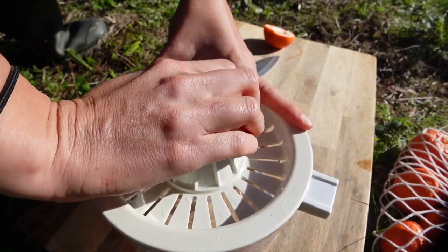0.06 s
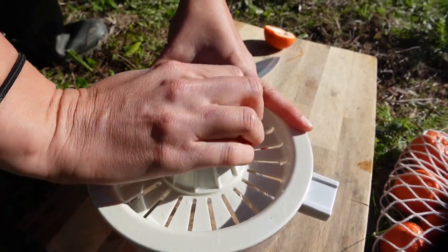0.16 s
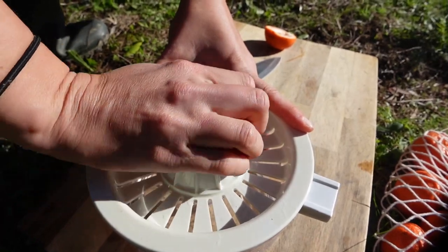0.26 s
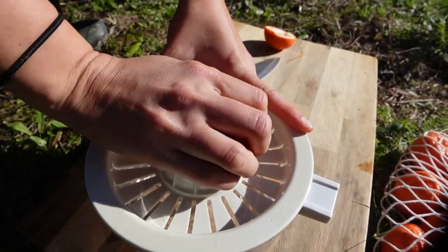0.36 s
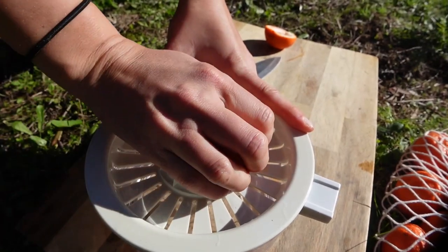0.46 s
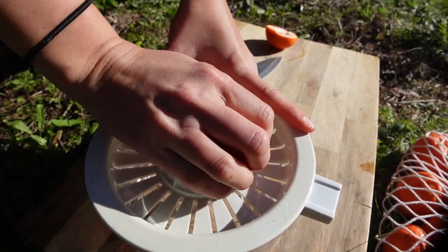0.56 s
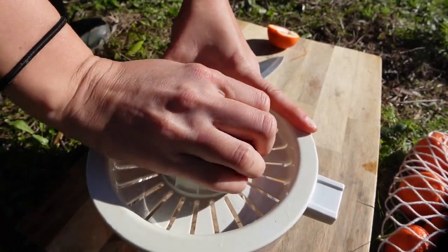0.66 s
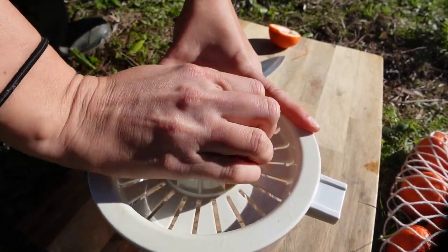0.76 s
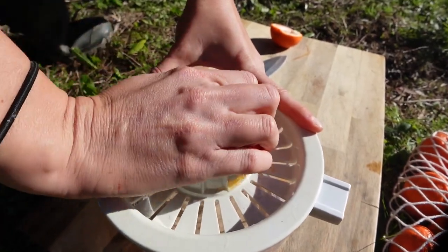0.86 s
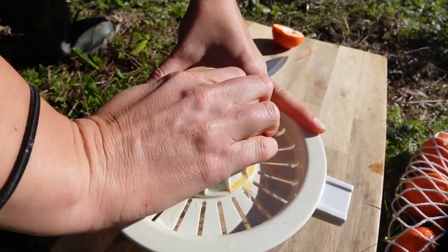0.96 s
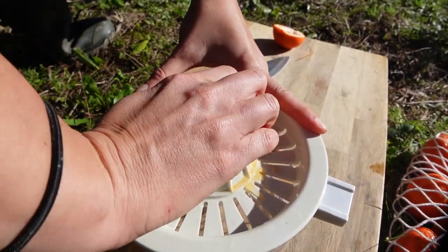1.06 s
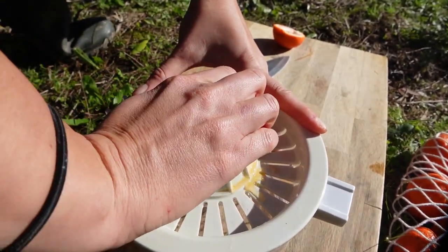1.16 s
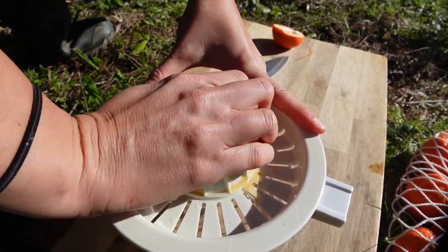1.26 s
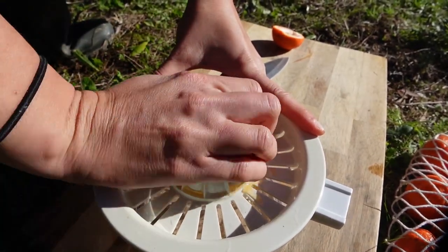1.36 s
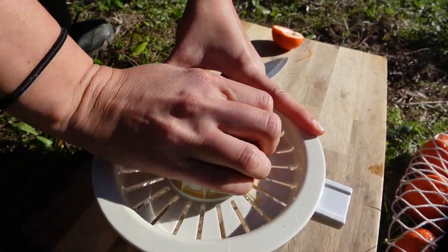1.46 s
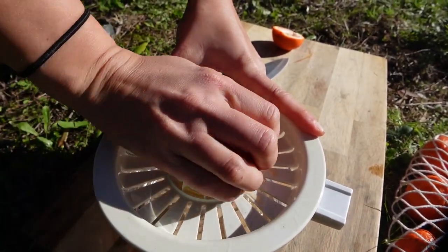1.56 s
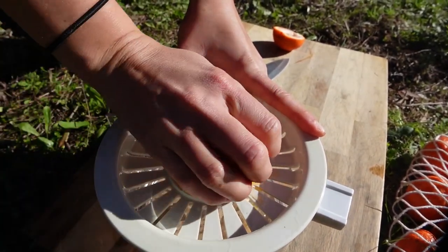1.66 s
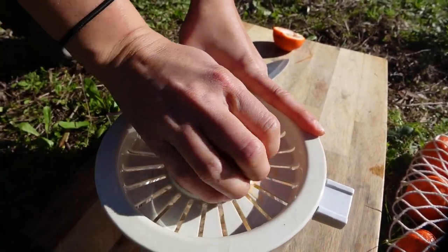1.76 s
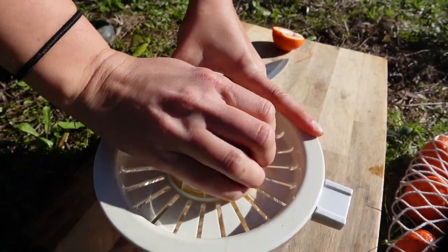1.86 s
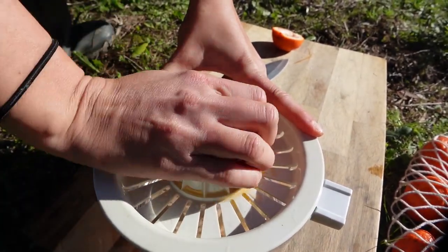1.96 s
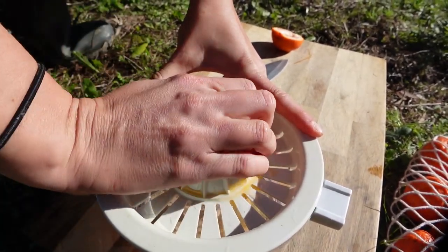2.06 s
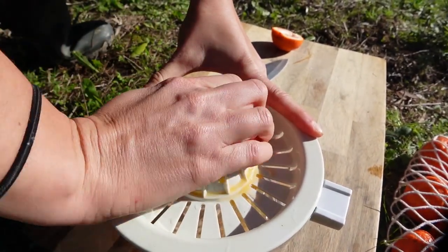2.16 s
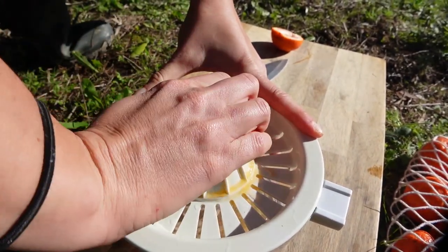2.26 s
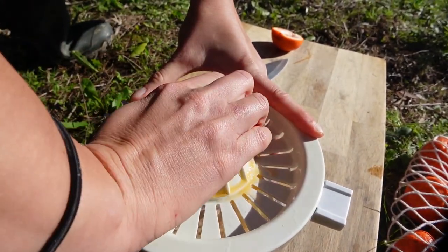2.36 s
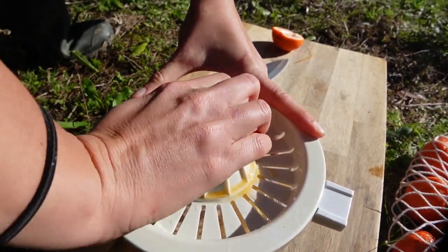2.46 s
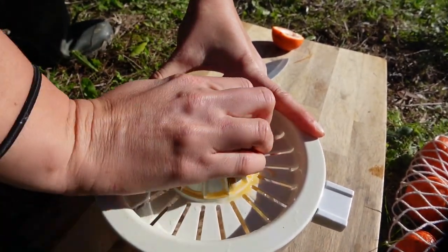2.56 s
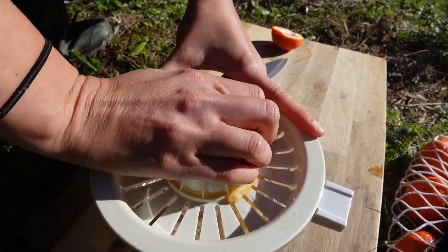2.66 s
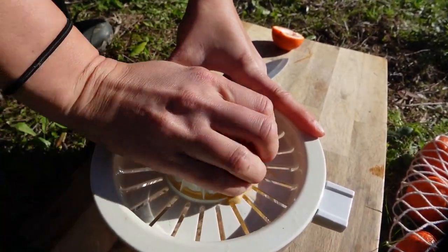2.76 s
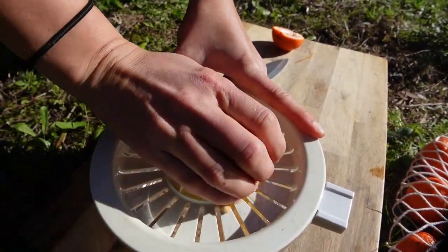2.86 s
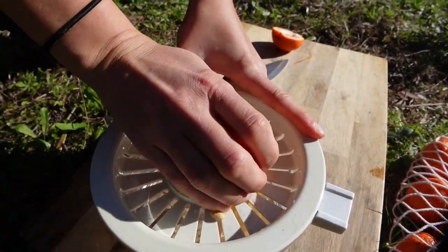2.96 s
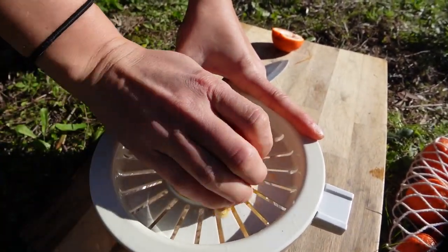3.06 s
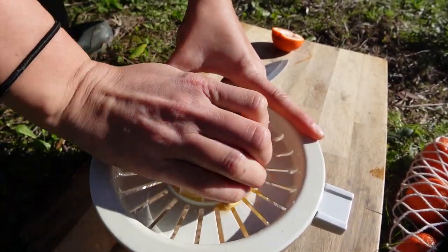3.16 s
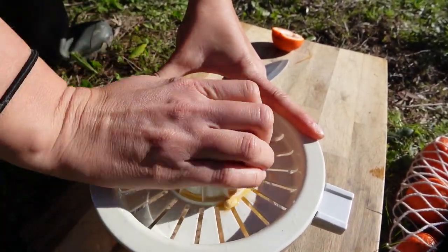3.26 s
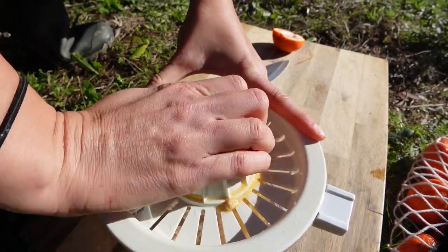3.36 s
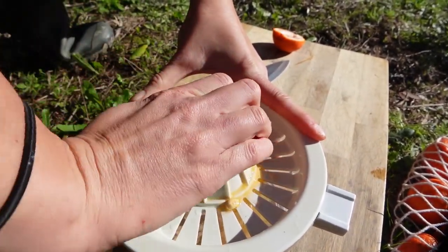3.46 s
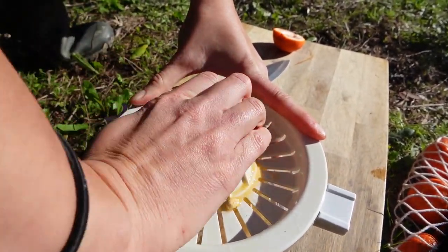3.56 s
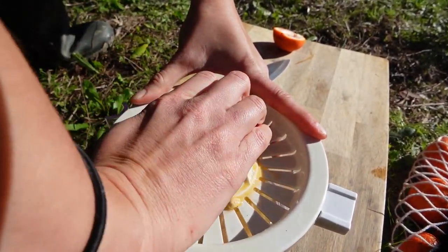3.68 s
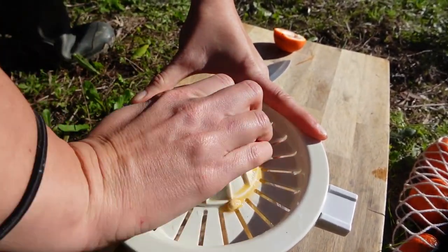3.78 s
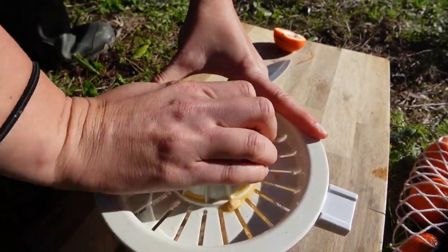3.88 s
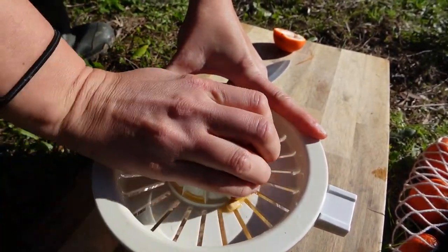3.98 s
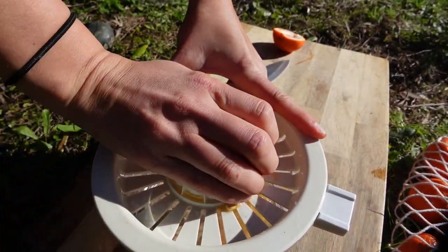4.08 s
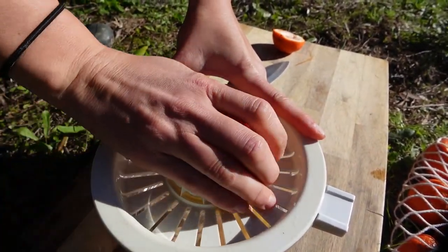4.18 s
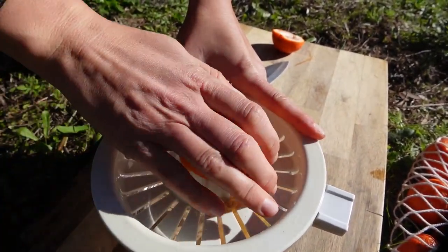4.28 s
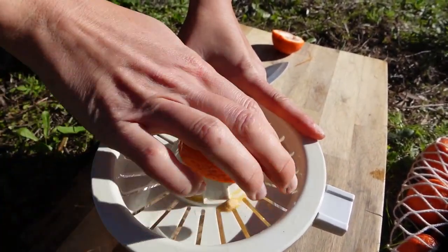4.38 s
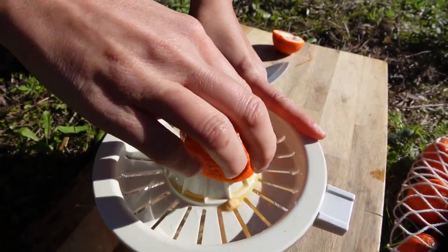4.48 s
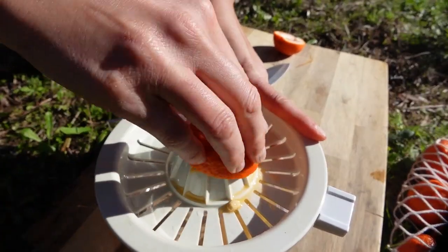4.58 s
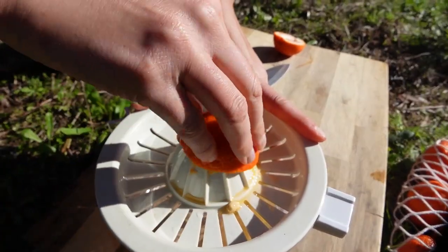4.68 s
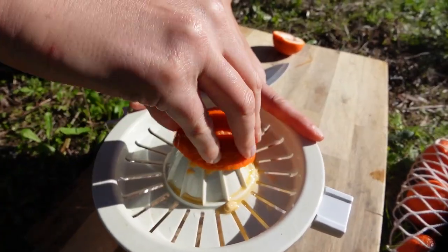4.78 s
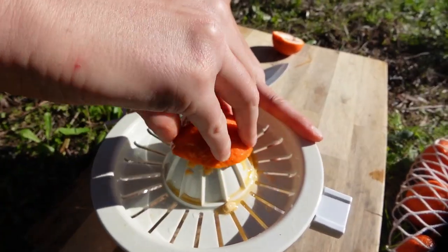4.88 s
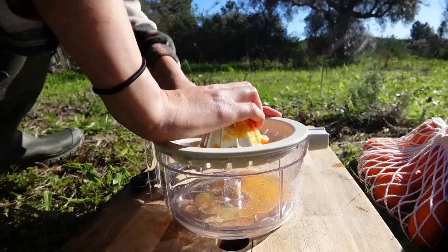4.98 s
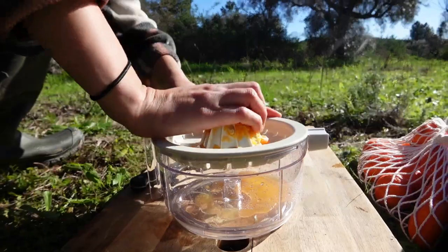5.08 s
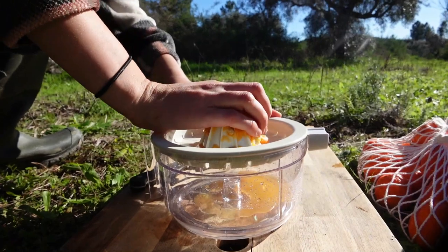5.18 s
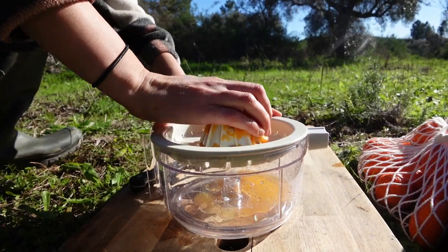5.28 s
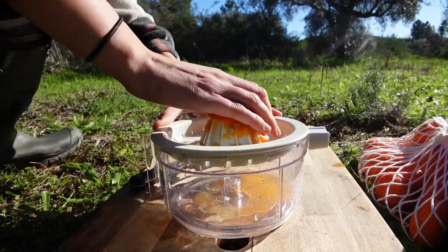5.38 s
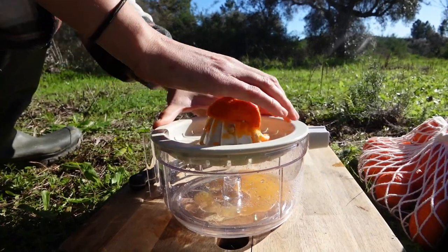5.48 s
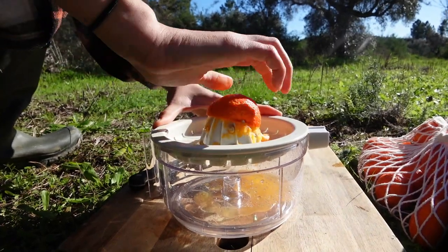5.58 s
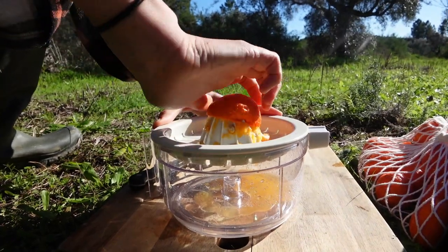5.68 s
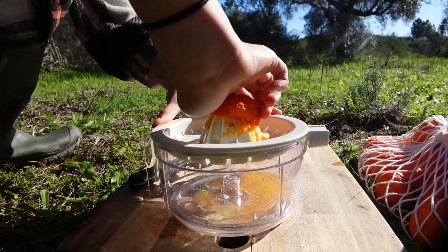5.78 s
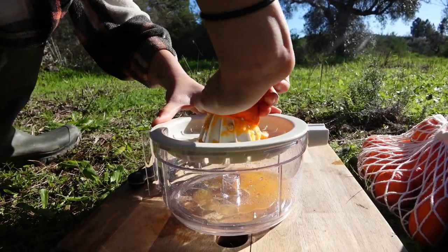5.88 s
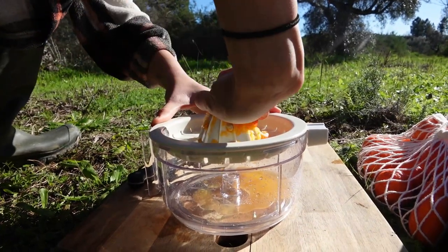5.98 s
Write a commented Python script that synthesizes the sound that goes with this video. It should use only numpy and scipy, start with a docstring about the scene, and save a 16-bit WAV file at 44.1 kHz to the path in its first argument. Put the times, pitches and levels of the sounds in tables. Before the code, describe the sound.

An orange half is twisted by hand on a ribbed plastic juicer, heard close up over a faint outdoor hush. The first turn swells into a wet crackle with a short rasp of peel and the loudest plastic knock at about 0.45 seconds. From 0.7 to 4.1 seconds, six more twists follow, roughly one every 0.6 seconds, each a soft squelch of tearing pulp with small juicy pops. Clusters of sharp plastic clicks come around 1, 2, 3.3 and 3.9 seconds, with brief wet swishes near 2.8 and 3.6. After 4.2 seconds the handling turns quieter, with light squishes and tiny pops, then a few more clicks just after 5 seconds. From about 5.2 to 5.8 seconds a small bird further off gives four faint, quick rattles of high falling notes. One last small squish comes at 6 seconds.

```python
"""Wet crackling and popping come first: an orange half is twisted by hand on the ribbed plastic reamer
of a juicer, on a wooden board in a field. Juice sacs rupture as tiny impulses and air pockets ring as
damped oscillators. The peel rasps by stick-slip friction, and the reamer slips and knocks in its bowl,
exciting the modes of the plastic. Near the end a small bird gives four short rattles of falling notes,
over a faint outdoor hush."""
import sys
import numpy as np
from scipy import signal
from scipy.fft import rfft, irfft, next_fast_len
from scipy.io import wavfile
from scipy.ndimage import map_coordinates

SR = 44100
rng = np.random.default_rng(int(sys.argv[2]) if len(sys.argv) > 2 else 0)


def persist_wave(psi):
    """Save psi, clipped to +-1, as 16-bit WAV."""
    counts = np.round(np.clip(psi, -1, 1) * 32767).astype(np.int16)
    wavfile.write(sys.argv[1], SR, np.atleast_2d(counts).T)


N = 265923
TIME = np.arange(N) / SR
HIT = np.arange(6000) / SR  # time axis of one short event [s]

# Spectrum of the open air: (frequency [Hz], gain [dB])
HUSH_SPECTRUM = [(25, -27), (42, -30), (65, -6.5), (120, -0.5), (165, -3), (220, -4.5), (360, -7),
                 (480, -10), (700, -5), (950, -11.5), (1300, -6), (2300, -13.5), (4000, -12), (7000, -21.5),
                 (16000, -29.5)]
# The bird's calls: (time [s], relative level [dB], growth per note [dB])
BIRD_RATTLES = [(5.184, -56, 2.5), (5.364, -57, 1.5), (5.558, -55, 0), (5.747, -57.5, 1)]
# Notes of one call: (delay [s], length [s], start pitch [Hz], end pitch [Hz], relative level [dB])
RATTLE_NOTES = [(0, 0.017, 5310, 4540, 3), (.019, 0.0142, 5230, 4490, 3.5), (.044, .016, 4900, 3890, -0.5),
                (.071, 0.0136, 4680, 3880, -4)]
# Modes of the plastic juicer, from bowl to ribs: (frequency [Hz], relative level [dB], t60 [s])
JUICER_MODES = [(398, -6.5, 0.065), (499.5, 1.5, 0.05), (567, -2, 0.041), (677, -3, 0.018),
                (1109, 0, 0.046), (1254, -3, 0.074), (1363.5, 0.5, 0.046), (1510, -9, 0.068),
                (1820, -5.5, 0.0058), (2004, -1.5, 0.064), (2680, 4, 0.037), (2971, -2.5, 0.053),
                (3100, -5, 0.053), (3320, -6.5, 0.076), (3894, -5.5, 0.06), (4094, 0.5, 0.022),
                (4437, -1, 0.032), (4710, -6, 0.056), (5590, -1.5, 0.041), (6200, -2.5, 0.051),
                (6800, -11.5, 0.14), (8190, -32, 0.045)]
# Turns of the hand, to and fro; the last three pull the peel loose, lift it and set it back:
# (start [s], hardest push [s], end [s], squelch [dB], swell at the push [dB], friction [dB], fizz [dB])
HAND_TURNS = [(0.0, 0.428, 0.51, -62, 11, -67.5, -68), (0.718, 1.025, 1.097, -63.5, 3.5, -68.5, -69),
              (1.317, 1.483, 1.76, -61, 4, -74, -71.5), (1.879, 2.04, 2.33, -61, 7, -71.5, -70),
              (2.544, 2.61, 3.02, -58.5, 4, -71.5, -77), (3.146, 3.36, 3.54, -60.5, 2.5, -69.5, -69.5),
              (3.822, 3.945, 4.123, -58.5, 5.5, -71.5, -64.5), (4.18, 4.253, 4.37, -68, 1, -79, -78),
              (4.654, 4.927, 5, -67, 7, -75.5, -72.5), (5.06, 5.12, 5.18, -63, 3.5, -66.5, -68.5),
              (5.972, 6.0, 6.03, -63, 1.5, -89, -75)]
# Wet peel slides without catching: (middle [s], half length [s], level [dB], centre [Hz])
PEEL_GLIDES = [(2.822, .05, -55.5, 4800), (3.605, 0.074, -60, 6900), (5.54, 0.051, -65, 7160)]
# Peel drags over the ribs: (middle [s], half length [s], rasp [dB], rasp centre [Hz], bowl hum [dB])
PEEL_RUBS = [(0.291, 0.0091, -47.5, 2700, -61), (0.411, 0.012, -40, 2850, -46.5),
             (0.422, 0.013, -42, 6270, -54.5), (0.472, 0.0076, -54, 6500, -48),
             (1.79, 0.017, -53, 2860, -71), (2.643, 0.0083, -49.5, 3000, -56),
             (2.936, 0.018, -57.5, 1100, -61.5), (5.145, 0.0051, -49, 1300, -46.5)]
# Spectra of the rasping peel, the humming bowl and the tearing pulp: (frequency [Hz], gain [dB])
RASP_SPECTRUM = [(500, -69), (1200, 9.5), (2200, 4), (2750, 10), (4300, 4), (6300, 2), (9000, 0.5),
                 (15000, -26)]
BOWL_SPECTRUM = [(200, -72), (330, -2), (410, 3.5), (520, 8), (680, 6), (900, -11), (1500, -74)]
PULP_SPECTRUM = [(600, -20), (900, -12.5), (1200, -5.5), (1900, -1), (2300, -6), (2750, -1), (3400, -2),
                 (4600, 0), (5600, -4.5), (8500, -9.5), (10000, -17), (12000, -22), (16000, -44)]
# Juice sacs and air pockets burst: (time [s], relative level [dB], pitch [Hz])
LOUD_POPS = [(0.0305, -52, 3300), (0.118, -55.5, 3300), (0.1338, -58, 3800), (0.1886, -57, 6700),
             (0.2846, -49.5, 5800), (0.4612, -42, 5000), (0.5107, -52.5, 6000), (0.6244, -53.5, 3130),
             (0.9542, -55, 6600), (1.3045, -42, 3270), (1.3167, -44, 4300), (1.3249, -41, 4100),
             (1.4036, -44.5, 4560), (1.5173, -51, 3740), (1.5728, -48, 4200), (1.5764, -41.5, 4200),
             (1.6817, -55, 3850), (1.7148, -51.5, 2920), (1.7304, -51.5, 3700), (2.0886, -50, 4500),
             (2.4908, -52, 4080), (2.4992, -45, 4800), (2.9937, -57, 3600), (3.388, -51.5, 3830),
             (3.9413, -40.5, 3960), (4.0736, -53, 3870), (4.2178, -62, 8400), (4.6402, -56.5, 4800),
             (4.6516, -57, 6500), (4.772, -58, 4640), (4.8107, -60.5, 5510), (4.86, -59.5, 3160)]
# The reamer slips in its seat, with the relative level of each part:
# (time [s], bowl [dB], strainer [dB], strainer centre [Hz], crack [dB], crack centre [Hz])
REAMER_KNOCKS = [(0.4478, -36.5, -41, 1420, -30.5, 2880), (0.7173, -54, -44.5, 1450, -42, 4160),
                 (0.9893, -49.5, -43, 1330, -36.5, 4530), (1.034, -52, -45.5, 1310, -40, 4400),
                 (1.0618, -64, -58, 1280, -53.5, 4010), (1.945, -51.5, -47.5, 1500, -39.5, 4650),
                 (1.9778, -52, -44.5, 1444, -39.5, 5020), (2.0053, -48, -40.5, 1410, -35.5, 4455),
                 (2.0343, -49, -46, 1360, -45.5, 3580), (2.1717, -48.5, -36.5, 1334, -33, 4400),
                 (2.6233, -59, -42, 1100, -34.5, 4350), (3.1358, -61, -43, 1440, -49.5, 3400),
                 (3.2011, -57, -47.5, 1110, -51, 4640), (3.2322, -58.5, -49.5, 1230, -56, 4720),
                 (3.33, -53.5, -51.5, 1250, -43.5, 2720), (3.376, -50, -45.5, 1470, -46, 3600),
                 (3.866, -59.5, -48.5, 1470, -42.5, 4370), (3.892, -61, -45, 1510, -41, 4760),
                 (3.9108, -59, -44, 1980, -40.5, 2920), (4.0501, -62, -51.5, 1250, -47.5, 4200),
                 (5.0257, -55, -44.5, 1300, -54.5, 2670), (5.0407, -75, -47, 1170, -50, 2330),
                 (5.1302, -66, -51.5, 1360, -48.5, 5200), (5.1425, -48.5, -40, 1220, -50, 2800),
                 (5.2094, -59, -49, 1490, -42, 4840)]
# Balance of a small slip: (bowl [dB], strainer [dB], strainer centre [Hz], crack [dB], crack centre [Hz])
SLIP_BALANCE = (-5, 0.5, 1250, -1, 3400)


def amp(db):
    """Amplitude ratio of a level in decibels."""
    return 10 ** (np.asarray(db) / 20)


def unit(x):
    """Normalisation to rms 1."""
    return x / np.sqrt(np.mean(x ** 2) + 1e-20)


def blow(x):
    """Normalisation to the energy of rms 1 held for 20 ms."""
    return x / np.sqrt(np.sum(x ** 2) / (SR / 50) + 1e-20)


def add(track, s, x):
    """Superposition of x on the track at time s."""
    i = max(round(s * SR), 0)
    track[i:i + len(x)] += x[:max(len(track) - i, 0)]


def colour(x, points):
    """Minimum-phase filter through (frequency [Hz], gain [dB]) points."""
    m = 2 * next_fast_len(len(x) // 2 + 2048)
    hz, db = np.transpose(points)
    gain = amp(np.interp(np.log(np.fft.rfftfreq(m, 1 / SR) + 1), np.log(hz), db))
    cepstrum = irfft(np.log(gain + 1e-6), m)
    cepstrum[1:m // 2] *= 2
    cepstrum[m // 2 + 1:] = 0
    return irfft(rfft(x, m) * np.exp(rfft(cepstrum)), m)[:len(x)]


def favour(x, hz, skirt_db):
    """Selective excitation: the contact spot favours one register, skirt_db above those an octave off."""
    return colour(x, [(hz / 2, -skirt_db), (hz / 2 ** .5, -skirt_db * 0.71), (hz, 0),
                      (hz * 2 ** .5, -skirt_db * 0.77), (hz * 2, -skirt_db)])


def band(x, lo_hz, hi_hz, order=2):
    """Causal band-pass filter."""
    edges = [lo_hz, min(hi_hz, SR / 2 - 100)]
    return signal.sosfilt(signal.butter(order, edges, 'band', fs=SR, output='sos'), x)


def wobble(rate):
    """Smooth random modulation through rate knots a second."""
    return map_coordinates(rng.standard_normal(int(N * rate / SR) + 4), [TIME * rate])


def hump(t, middle, half):
    """Gaussian envelope, down to 1/e at middle +/- half."""
    return np.exp(-((t - middle) / half) ** 2)


def fade(t60):
    """Exponential damping by 60 dB in t60 seconds."""
    return np.exp(-np.log(1000) * HIT / t60)


def burst(t60, tail_db, tail_t60):
    """Double-slope decay: noise with a fast part and a slower tail."""
    return rng.standard_normal(len(HIT)) * (fade(t60) + amp(tail_db) * fade(tail_t60))


def scattered(x, wet_db, t60):
    """Diffuse reflection: nearby things add a faint tail to the direct sound."""
    tail = rng.standard_normal(len(HIT)) * fade(t60) * (1 - np.exp(-HIT / 0.0025))
    return x + amp(wet_db) * signal.fftconvolve(x, tail / np.linalg.norm(tail))[:N]


def hush():
    """Ambient noise: distant rumble and hiss, with a low swell and a hollow rustle near the end."""
    swell = amp(-70) * hump(TIME, 5.72, 0.15) * unit(band(rng.standard_normal(N), 124, 210, order=3))
    rustle = amp(-73) * hump(TIME, 5.33, 0.32) * unit(band(rng.standard_normal(N), 576, 724))
    air = amp(-66.5 + 0.14 * wobble(4.4)) * unit(colour(rng.standard_normal(N), HUSH_SPECTRUM))
    return air + swell + rustle


def bird(rough_hz=450, flutter_hz=800):
    """Fast frequency and amplitude modulation roughens the four falling notes of each rattle."""
    out = np.zeros(N)
    for s, db, growth_db in BIRD_RATTLES:
        for k, (delay, length, start_hz, end_hz, note_db) in enumerate(RATTLE_NOTES):
            progress = np.minimum(HIT / length, 1)
            jitter, shimmer = [unit(band(n, 115, flutter_hz)) for n in rng.standard_normal((2, len(HIT)))]
            hz = start_hz + (end_hz - start_hz) * progress + rough_hz * jitter
            envelope = np.abs(np.sin(np.pi * progress)) ** .5 * (1 + 0.31 * shimmer)
            note = envelope * np.sin(2 * np.pi * np.cumsum(hz) / SR)
            add(out, s + delay, amp(db + note_db + k * growth_db + 2.5) * note)
    return out


def turning(grip_db_per_s=220, release_db_per_s=139, push_half_s=0.081):
    """Amplitude follows effort: friction, squelch and fizz rise, swell at the push and die each turn."""
    friction, squelch, fizz = np.zeros((3, N))
    for start, push, end, squelch_db, swell_db, friction_db, fizz_db in HAND_TURNS:
        before, after = np.maximum(start - TIME, 0), np.maximum(TIME - end, 0)
        hold_db = -grip_db_per_s * before - release_db_per_s * after
        push_db = swell_db / (1 + ((TIME - push) / push_half_s) ** 2)
        effort = amp(hold_db + push_db)
        friction += amp(friction_db + hold_db + 0.89 * push_db)
        squelch += amp(squelch_db) * effort
        fizz += amp(fizz_db) * effort
    return friction, squelch, fizz


def by_chance(squelch, rate, over_db, spread_db):
    """Jittered event train, rate a second, that follows the squelch: (time [s], level [dB])."""
    timing, size = rng.random((int(rate * N / SR), 2)).T
    s = (np.arange(len(timing)) + timing) / rate
    level_db = 20 * np.log10(squelch[np.minimum(s * SR, N - 1).astype(int)] + 1e-9)
    return np.column_stack([s, level_db + over_db + spread_db * np.sqrt(3) * (2 * size - 1)])


def ring(lo_hz, hi_hz, scatter_db, detune=0.00605):
    """Modal vibration of the juicer in one register, struck at a new spot each time."""
    hz, db, t60 = np.transpose([mode for mode in JUICER_MODES if lo_hz <= mode[0] < hi_hz])[:, :, None]
    size, shift = rng.standard_normal((2, len(hz), 1))
    sign = (-1) ** np.arange(len(hz))[:, None]
    phase = 2 * np.pi * hz * (1 + detune * shift) * HIT
    modes = sign * amp(db + scatter_db * size) * fade(t60) * np.cos(phase)
    return unit(band(modes.sum(axis=0), lo_hz, hi_hz))


def crackle(rate, spread_db, smooth):
    """Shot noise: tiny ruptures of unequal size, rate a second, over a smooth share of noise."""
    sizes = amp(spread_db * np.minimum(rng.standard_normal(N), 2.6))
    grains = (rng.random(N) < rate / SR) * sizes * rng.choice([-1, 1], N)
    return unit(grains) + smooth * rng.standard_normal(N)


def glides():
    """Sliding friction: wet peel gives a soft swish that swells and fades."""
    out = np.zeros(N)
    for middle, half, db, hz in PEEL_GLIDES:
        swish = colour(crackle(rate=3000, spread_db=5, smooth=1.2), PULP_SPECTRUM)
        out += amp(db) * hump(TIME, middle, half) * unit(favour(swish, hz, skirt_db=5.5))
    return out


def rubs():
    """Stick-slip friction: quick runs of the peel rasp on the ribs and hum in the bowl."""
    out = np.zeros(N)
    for middle, half, rasp_db, rasp_hz, bowl_db in PEEL_RUBS:
        slips = rng.standard_normal(len(HIT)) * amp(3.9 * rng.standard_normal(len(HIT)))
        rasp = amp(rasp_db) * unit(favour(colour(slips, RASP_SPECTRUM), rasp_hz, skirt_db=10.5))
        hum = amp(bowl_db) * unit(colour(slips, BOWL_SPECTRUM))
        add(out, middle - HIT.mean(), hump(HIT, HIT.mean(), half) * (rasp + hum))
    return out


def beads(rate, centre_hz, spread_db):
    """Bubble resonance: tiny juice bubbles, rate a second, each ring at their own pitch."""
    pitch, size = np.hsplit(rng.standard_normal((int(rate * N / SR), 2)), 2)
    starts = rng.integers(0, N, len(pitch))
    cycles = np.minimum(centre_hz * np.exp(.4 * pitch), 11000) * HIT[:200]
    envelopes = amp(spread_db * np.minimum(size, 2)) * cycles * np.exp(-cycles / 1.1)
    grains = envelopes * np.sin(2 * np.pi * cycles)
    samples = starts[:, None] + np.arange(cycles.shape[1])
    return unit(np.bincount(samples.ravel(), grains.ravel(), N)[:N])


def crunches(rate=24, decay_s=0.0055):
    """Relaxation: the gain of the tearing jumps as a cluster of sacs gives way, then falls back."""
    starts = (rng.random(N) < rate / SR) * rng.random(N)
    return unit(1 + amp(2) * signal.fftconvolve(starts, np.exp(-HIT / decay_s))[:N])


def pulp(friction, squelch, fizz, catch_db=4.5, catch_rate=16):
    """Rupture and forced vibration: flesh tears, juice fizzes and friction drives the plastic's modes."""
    friction = friction * amp(catch_db * wobble(catch_rate))  # the peel catches on the ribs
    clumps = crunches() * amp(0.8 * wobble(90) + 1.13 * wobble(catch_rate))  # the pulp yields unevenly
    fine = crackle(rate=1500, spread_db=4, smooth=0.4)
    coarse = crackle(rate=90, spread_db=2.5, smooth=0)
    tears = clumps * (fine + 0.58 * coarse)
    sprays = clumps * crackle(rate=1300, spread_db=4, smooth=0.82)
    drag = tears + 0.9 * clumps * rng.standard_normal(N)
    registers_hz = [(310, 1000), (950, 2800), (2300, 2900), (2800, 9500)]
    bowl, strainer, rim, ribs = [unit(signal.fftconvolve(drag, ring(lo, hi, scatter_db=-2))[:N])
                                 for lo, hi in registers_hz]
    flesh = unit(band(colour(tears, PULP_SPECTRUM), 430, 6300, order=3))
    wet = unit(flesh + .4 * ribs + .6 * beads(rate=150, centre_hz=4200, spread_db=4.5))
    mist = unit(band(colour(0.28 * tears + sprays, PULP_SPECTRUM), 6800, 16000, order=3))
    froth = unit(band(beads(rate=210, centre_hz=6900, spread_db=-3), 5100, 8500, order=3))
    hollow = bowl + amp(-6.5 + catch_db * wobble(catch_rate)) * rim
    plastic = friction * hollow + amp(-3.5) * np.sqrt(friction * squelch) * strainer
    return plastic + squelch * wet + fizz * unit(mist + .5 * froth)


def bubble(hz, decay_cycles):
    """Damped oscillation: a small pocket swells and dies within a few cycles."""
    cycles = hz * HIT
    return np.sin(2 * np.pi * cycles) * cycles ** 2 * np.exp(-cycles / decay_cycles)


def pops(squelch, usual_hz=4680, spread_octaves=0.52):
    """Resonance: a pocket in the pulp bursts, and the ribs near its pitch ring on for a moment."""
    out = np.zeros(N)
    small = [(s, db, usual_hz * 2 ** (spread_octaves * np.clip(rng.standard_normal(), -2, 2)))
             for s, db in by_chance(squelch, rate=8, over_db=0, spread_db=1.5)]
    for s, db, hz in list(LOUD_POPS) + small:
        tail = unit(burst(.015, -18, .05)) + .45 * ring(2300, 10000, scatter_db=2)
        pop = unit(bubble(hz, decay_cycles=0.52)) + 1.05 * unit(favour(tail, hz, skirt_db=12.5))
        add(out, s, amp(db - 0.5) * blow(band(pop, 1080, min(hz * 1.71, 12000), order=4)))
    return out


def knocks(squelch, edge_db_per_octave=21):
    """Impact excitation: each slip thumps the bowl, rings the strainer and cracks in the ribs' modes."""
    out = np.zeros(N)
    is_level = np.array([1, 1, 0, 1, 0])
    small = [(s, *(SLIP_BALANCE + db * is_level))
             for s, db in by_chance(squelch, rate=4, over_db=-5, spread_db=2.5)]
    for s, bowl_db, strainer_db, strainer_hz, crack_db, crack_hz in list(REAMER_KNOCKS) + small:
        bowl = ring(273, 890, scatter_db=-0.5) + .5 * unit(band(burst(0.038, -31, 0.11), 250, 910))
        bowl_hz = np.interp(bowl_db, [-58, -37], [620, 415])  # a heavier thump reaches the lowest mode
        strainer = ring(930, 2400, scatter_db=5) + 0.86 * unit(band(burst(0.048, -22, 0.13), 920, 2970))
        snap = unit(band(signal.unit_impulse(len(HIT)), 3280, 5920))  # the first contact
        ping = unit(np.sin(2 * np.pi * crack_hz * HIT) * fade(0.021))  # the struck rib
        ribs = 0.58 * ring(2270, 9400, scatter_db=2) + unit(band(burst(0.013, -19, 0.042), 1670, 6860))
        crack = ribs + 0.66 * snap + amp(-9.5) * ping
        edge = colour(burst(0.0079, 2, 0.034),
                      [(4500, -41), (6500, 15.5), (8500, 10.5), (10000, -2.5), (12000, -12), (15500, -22)])
        edge_db = crack_db - 11 + edge_db_per_octave * np.log2(crack_hz / 4480)  # higher is sharper
        add(out, s, amp(bowl_db - 0.5) * blow(favour(bowl, bowl_hz, skirt_db=5.5)))
        add(out, s, amp(strainer_db - 0.9) * blow(favour(strainer, strainer_hz, skirt_db=9.5)))
        add(out, s, amp(crack_db - 0.7) * blow(favour(crack, crack_hz, skirt_db=13)))
        add(out, s, amp(edge_db) * blow(edge))
    return out


def scene():
    """Superposition in one channel: the juicer close by, the bird further off, the field behind."""
    friction, squelch, fizz = turning()
    contacts = scattered(knocks(squelch) + pops(squelch) + rubs(), wet_db=-19, t60=0.11)
    juicer = contacts + pulp(friction, squelch, fizz) + glides()
    return (juicer + scattered(bird(), wet_db=-7, t60=0.04) + hush())[None]


def record(dry):
    """Band limiting: an ideal low-pass filter passes nothing above top_hz."""
    top_hz = 15900
    m = next_fast_len(N + SR // 2)
    return irfft(rfft(dry, m) * (np.fft.rfftfreq(m, 1 / SR) < top_hz), m)[..., :N]


dry = scene()
out = record(dry)
persist_wave(out)
```